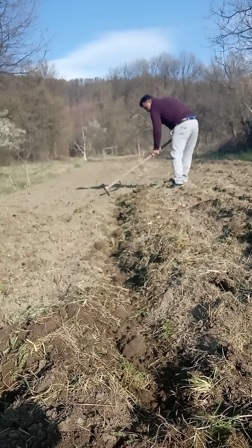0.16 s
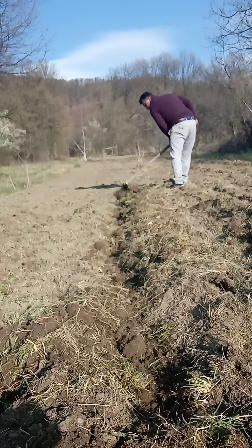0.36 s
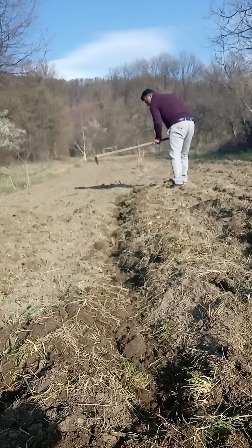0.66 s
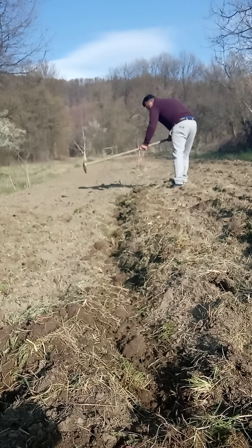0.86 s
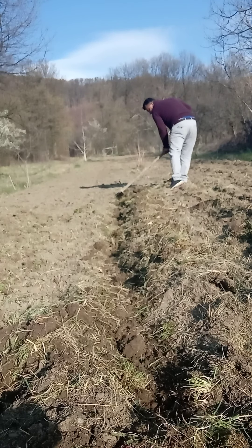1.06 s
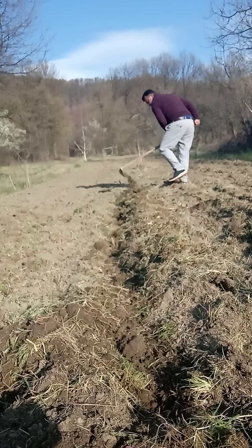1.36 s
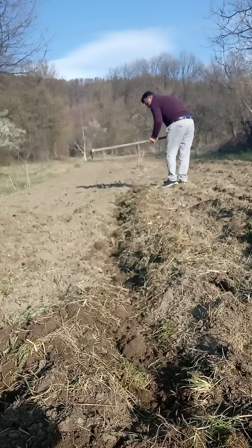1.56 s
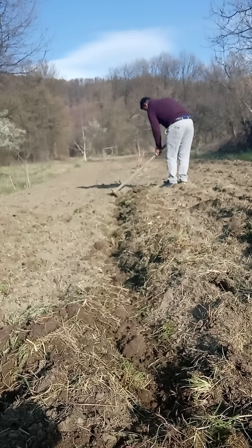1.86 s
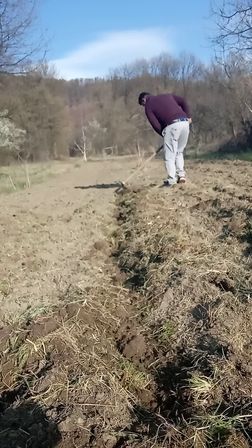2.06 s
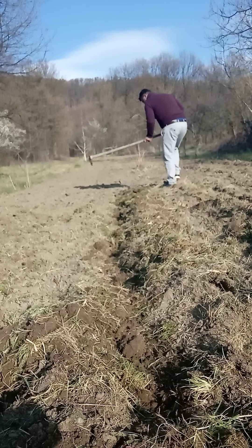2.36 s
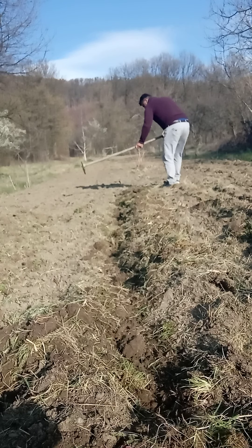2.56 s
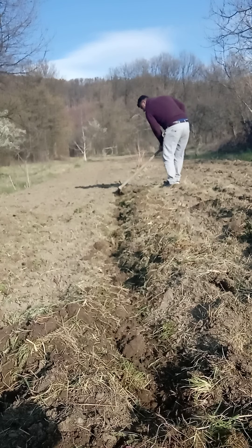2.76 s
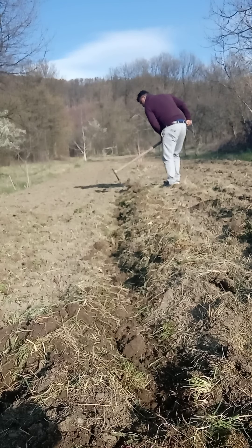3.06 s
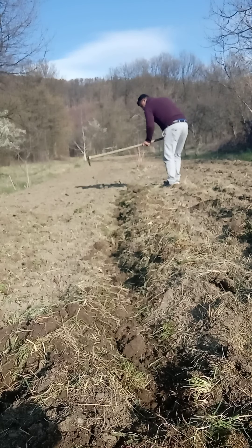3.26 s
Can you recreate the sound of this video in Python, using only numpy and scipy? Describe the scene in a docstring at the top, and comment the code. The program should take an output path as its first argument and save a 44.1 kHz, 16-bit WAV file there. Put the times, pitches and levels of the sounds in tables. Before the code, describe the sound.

Phone vibration motor buzzes twice, about a second each, while a hoe faintly scratches soil outdoors.

```python
"""A quiet field where a phone's vibration motor buzzes twice while a hoe scratches the soil metres away.
Each buzz spins up, holds and coasts: an off-centre weight shakes the case as a low sine and loose parts
rattle as coloured noise. The brushes tick, whine in multiples of the shaft speed and hiss in gated noise.
The hoe is short filtered noise with an echo; behind it lie a soft mid hush, far rumble and traffic wash."""
import sys
import numpy as np
from scipy import signal
from scipy.fft import rfft, irfft
from scipy.io import wavfile
from scipy.ndimage import uniform_filter1d

SR = 44100
rng = np.random.default_rng(int(sys.argv[2]) if len(sys.argv) > 2 else 0)


def level_to_linear(level):
    """Convert decibel levels to linear amplitude factors, elementwise."""
    exponent = np.asarray(level, float) / 20
    return 10 ** exponent


def put_to_file(sound):
    """Save the sound as 16-bit audio at rate SR, in the file named by the first command-line argument."""
    columns = np.atleast_2d(sound).T  # one column per channel
    safe = np.clip(columns, -1, 1)
    whole_steps = np.round(safe * 32767)
    wavfile.write(sys.argv[1], SR, whole_steps.astype(np.int16))


N = 149940
FULL_SPEED_HZ = 187.6  # shaft speed that the whine and the brushes are scaled to


def curve(table, at):
    """Straight lines through (x, y) rows."""
    return np.interp(at, *np.array(table, float).T)


def unit(x):
    """Scaled to rms 1."""
    return x / np.sqrt(np.mean(x ** 2))


def coloured(table, lo_hz=1., hi_hz=30000.):
    """Noise shaped by (Hz, dB) rows; a lo_hz above 1 tapers it to the band lo_hz to hi_hz."""
    hz = np.maximum(np.arange(N // 2 + 1) * SR / N, 1)
    row_hz, row_db = np.array(table, float).T
    taper = 1
    if lo_hz > 1:
        place = np.log(hz / lo_hz) / np.log(hi_hz / lo_hz)
        taper = np.sin(np.pi * np.clip(place, 0, 1))
    gain = level_to_linear(np.interp(np.log(hz), np.log(row_hz), row_db))
    return irfft(rfft(rng.standard_normal(N)) * taper * gain, N)


def walk(rate):
    """Random levels held 1 / rate s and slewed twice; rms 1."""
    k = int(SR / rate)
    steps = np.repeat(rng.standard_normal(N // k + 1), k)
    return unit(uniform_filter1d(uniform_filter1d(steps, k), k)[:N])


def band(x, hz, width_hz):
    """Resonant band-pass, applied twice."""
    b, a = signal.iirpeak(hz, hz / width_hz, SR)
    return signal.lfilter(b, a, signal.lfilter(b, a, x))


def field(t):
    """Bands of hush that swell together and flicker alone, a low rumble and a far traffic wash."""
    # Colour of the hush. Each row: frequency in Hz, relative level in dB per Hz.
    hush_colour = [(15, -68.5), (25, -42.5), (45, -12), (65, -5), (110, -9), (170, -17), (260, -28.5),
                   (400, -34.5), (520, -24.5), (800, -25.5), (1000, -13.5), (1300, -18), (1700, -21),
                   (2100, -35), (2800, -45.5), (4000, -48), (6000, -48.5), (8000, -59.5), (16000, -64.5)]
    # How the hush swells and sinks. Each row: time in seconds, level change in dB.
    hush_swell = [(0, -0.5), (1.2, 1), (1.4, 2), (1.47, -1), (1.7, -0.5), (1.85, -2), (2.0, 0), (2.6, -2)]
    # Far rumble. Each row: time in seconds, rms level in dB.
    rumble_level = [(0, -72), (2.25, -71.5), (2.9, -59.5), (3.4, -62)]
    # Far traffic wash. Each row: time in seconds, rms level in dB.
    wash_level = [(0, -77), (.9, -73), (1.25, -74.5), (1.4, -72), (1.5, -80), (2.1, -79.5), (2.9, -76),
                  (3.3, -74)]
    hush_db, flicker_db = -65, 2.5

    swell = curve(hush_swell, t)
    hush = np.zeros(N)
    for lo_hz in 14 * 2 ** np.arange(0, 10.2, 1 / 3):
        # bands two thirds of an octave wide, a third apart
        noise = coloured(hush_colour, lo_hz, lo_hz * 2 ** (2 / 3))
        hush += level_to_linear(swell + flicker_db * walk(6.99)) * noise
    rumble = unit(band(rng.standard_normal(N), 62.1, 8.8))
    wash = unit(band(rng.standard_normal(N), 668, 350))
    out = level_to_linear(hush_db) * unit(hush)
    out += level_to_linear(curve(rumble_level, t)) * rumble
    return out + level_to_linear(curve(wash_level, t)) * wash


def shaft(t):
    """Speed and turns of the shaft: it spins up under power, then slows in a straight line to rest."""
    # Start of each buzz, in seconds.
    starts_s = (.1336, 2.134)
    # Powered shaft speed, one list a buzz. Each row: time in seconds, speed in Hz.
    speed = [
        [(0.2, 145.1), (0.252, 168.0), (0.278, 176.4), (0.298, 179.8), (0.328, 182.6), (0.38, 184.7),
         (0.502, 187.2), (0.738, 186.9), (1.12, 188.1)],
        [(2.2, 145.6), (2.222, 151.1), (2.264, 169.9), (2.282, 175.9), (2.314, 180.3), (2.352, 183.3),
         (2.498, 187.0), (2.94, 187.7), (3.12, 187.6)],
    ]
    power_s, coast_s = .99, .19
    jitter_turns, spin_up_jitter_turns = .00022, .03  # the second is scaled by the lack of speed

    since = np.where(t < starts_s[1], t - starts_s[0], t - starts_s[1])
    coast = np.clip(since - power_s, 0, None)
    rests = [(s, 0) for s in starts_s]
    hold = [(starts_s[1] - .001, speed[0][-1][1])]
    powered = sorted(rests + speed[0] + speed[1] + hold)
    hz = curve(powered, t) * np.clip(1 - coast / coast_s, 0, 1)
    hz = uniform_filter1d(hz, size=400)
    turns = np.cumsum(hz) / SR
    lack = np.clip(.97 - hz / FULL_SPEED_HZ, 0, 1)
    shaky_turns = turns + (jitter_turns + spin_up_jitter_turns * lack) * walk(190)
    return since, coast, hz, turns, shaky_turns


def shake_gain(hz, coast):
    """Strength of the case's shake, which follows shaft speed and dies off further in the coast."""
    # Shake under power. Each row: shaft speed in Hz, rms level in dB.
    shake_level = [(60, -86), (120, -54.5), (143, -53.5), (163, -43), (174, -39), (188, -38)]
    coast_loss_db_per_s = -150
    return level_to_linear(curve(shake_level, hz) + coast_loss_db_per_s * coast)


def case_shake(shake, turns):
    """The off-centre weight pushes the case once a turn, a plain sine."""
    return np.sqrt(2) * shake * np.sin(2 * np.pi * turns)


def case_rattle(shake, since):
    """Loose rattle of the case: coloured noise that follows the shake."""
    # Colour of the rattle. Each row: frequency in Hz, relative level in dB per Hz.
    rattle_colour = [(60, -28.5), (120, 12), (230, 6), (320, -5.5), (420, -19), (700, -6.5), (1200, -3.5),
                     (1600, -2), (2000, -47), (2600, -31.5), (7500, -31.5), (10000, -51)]
    # Rattle beyond its steady share. Each row: seconds after the start, extra level in dB.
    rattle_rise = [(0, 13), (.07, 19), (.1, 12), (.13, 1), (.2, 1.5), (.99, 1), (1.03, 20.5)]
    share_db = -23.5  # against the shake
    return level_to_linear(share_db + curve(rattle_rise, since)) * shake * unit(coloured(rattle_colour))


def brush_hiss(since, hz, shaky_turns):
    """Sliding brushes hiss; the turning shaft gates the noise, which is grittier at low speed."""
    # Hiss over a buzz. Each row: seconds after the start, level in dB.
    hiss_level = [(0, -70), (.02, -66), (.05, -65), (.075, -60), (.11, -60.5), (.15, -65), (.25, -69),
                  (.4, -70.5), (.98, -71), (1.0, -68), (1.02, -70), (1.12, -72), (1.16, -78), (1.24, -93)]
    # Colour of the hiss. Each row: frequency in Hz, relative level in dB per Hz.
    hiss_colour = [(1100, -25), (1800, -11.5), (2160, -2.5), (2500, -12.5), (3000, -8.5), (3600, -8),
                   (4600, -6.5), (6000, -8.5), (7000, -6.5), (8100, -19), (10800, -22.5), (13300, -41),
                   (15200, -30), (16500, -49)]
    # Top end of the hiss. Each row: seconds after the start, level change in dB.
    hiss_top = [(.11, 0), (.25, -9), (.4, -15), (.98, -15), (1.02, 2), (1.12, -6), (1.22, -15)]
    segments, gate_depth = 2.5, .4  # gatings a turn
    grit_db, top_from_hz, flutter_db = 1, 6800, 2

    gate = 1 + gate_depth * np.sin(2 * np.pi * segments * shaky_turns)
    gate += gate_depth * np.sin(2 * np.pi * shaky_turns)
    slowness = np.clip(1 - hz / FULL_SPEED_HZ, 0, 1) ** .5
    gate = unit(gate) * level_to_linear(grit_db * slowness * walk(500))
    hiss = unit(coloured(hiss_colour))
    low = signal.sosfiltfilt(signal.butter(3, top_from_hz, fs=SR, output="sos"), hiss)
    hiss = low + level_to_linear(curve(hiss_top, since)) * (hiss - low)
    sounding = (since > 0) * (since < 1.5)
    return level_to_linear(curve(hiss_level, since) + flutter_db * walk(10)) * sounding * gate * hiss


def brush_ticks(t):
    """First brush contacts: a click and a fast-fading chatter ring wide resonances."""
    # Contacts. Each row: time in seconds, level in dB of the click before it rings.
    contacts = [(0.134, -43), (.141, -41.5), (0.15, -48), (0.1575, -46), (2.135, -41), (2.139, -52),
                (2.142, -54), (2.1515, -55), (2.1547, -57)]
    # What a contact rings. Each row: frequency in Hz, width of the narrower filter in Hz, gain in dB.
    tick_rings = [(4130, 1640, 16), (6640, 2200, 12), (10300, 3300, -4.5)]
    chatter_s, chatter_db = .0008, -17.5  # decay time, level against the click

    ticks = np.zeros(N)
    n = SR // 100
    for start_s, db in contacts:
        click = level_to_linear(chatter_db) * rng.standard_normal(n) * np.exp(-t[:n] / chatter_s)
        click[0] = 1
        at = int(start_s * SR)
        ticks[at:at + n] += level_to_linear(db) * click
    out = np.zeros(N)
    for ring_hz, width_hz, db in tick_rings:
        out += level_to_linear(db) * band(band(ticks, ring_hz, width_hz), ring_hz, 2 * width_hz)
    return out


def brush_whine(hz, coast, shaky_turns):
    """Multiples of the shaft speed, louder with speed and where they sweep through rings of the case."""
    # Whine at full speed. Each row: multiple of the shaft speed, relative level in dB (first row unused).
    multiples = [(1, 0), (2, -43), (3, -38), (4, -47), (5, -24.5), (6, -39), (7, -36), (8, -21), (9, -29),
                 (10, -56), (11, -35), (12, -40), (13, -33), (14, -43), (15, -38), (16, -59), (17, -31),
                 (18, -44), (19, -40), (20, -33), (21, -39), (22, -38), (23, -38), (24, -35), (25, -40),
                 (26, -31), (27, -37), (28, -38), (29, -40), (30, -35), (31, -45), (32, -32), (33, -50),
                 (34, -47), (35, -42), (36, -48), (37, -46), (38, -48), (39, -57), (40, -56), (41, -44),
                 (42, -57), (43, -53), (44, -55), (45, -64), (46, -60), (47, -65), (48, -55), (49, -57),
                 (50, -70), (51, -66), (52, -60), (53, -59), (54, -76), (55, -59), (56, -58), (57, -59),
                 (58, -60), (59, -71), (60, -59), (61, -69), (62, -72), (63, -75), (64, -58), (65, -71),
                 (66, -60), (67, -70), (68, -64), (69, -74), (70, -70), (71, -72), (72, -74), (73, -73),
                 (74, -76), (75, -73), (76, -68), (77, -70), (78, -66), (79, -72), (80, -67), (81, -67),
                 (82, -65), (83, -60), (84, -68)]
    # Rings of the case. Each row: frequency in Hz, offset in Hz where a ring is down to a quarter, gain in dB.
    case_rings = [(1510, 60, 3), (2165, 60, 25), (3195, 90, 8), (3790, 120, 6), (4890, 140, 4)]
    # Low multiples that flutter more than the others.
    low_orders = (2, 3, 4, 6, 7)
    whine_db, db_per_octave, off_s = -38, 19, .012  # off_s: decay time once power is off
    flutter_db, low_flutter_db = 1.5, 4
    ring_lift_db = 11  # most that a ring lifts a multiple

    ring_hz = np.arange(SR // 2)
    ring_gain = np.ones(len(ring_hz))
    for centre_hz, width_hz, db in case_rings:
        ring_gain += level_to_linear(db) / (1 + ((ring_hz - centre_hz) / width_hz) ** 2) ** 2

    def ring(f):
        return np.interp(f, ring_hz, ring_gain)

    octaves = np.log2(hz / FULL_SPEED_HZ + 1e-6)
    loud = level_to_linear(whine_db + db_per_octave * octaves) * np.exp(-coast / off_s)
    on = np.flatnonzero(loud > 1e-5)
    flutter = [level_to_linear(flutter_db * walk(12))[on] for _ in range(5)]
    low_flutter = [level_to_linear(low_flutter_db * walk(9.004))[on] for _ in range(2)]
    whine = np.zeros(len(on))
    spin = wheel = np.exp(2j * np.pi * shaky_turns[on])
    for (k, db), phase in zip(multiples[1:], rng.random(len(multiples))):
        waver = low_flutter[k // 4 % 2] if k in low_orders else flutter[k % 5]
        lift = np.minimum(ring(k * hz[on]) / ring(k * FULL_SPEED_HZ), level_to_linear(ring_lift_db))
        wheel = wheel * spin  # the next multiple
        whine += level_to_linear(db) * waver * lift * (wheel * np.exp(2j * np.pi * phase)).imag
    out = np.zeros(N)
    out[on] = np.sqrt(2) * loud[on] * whine
    return out


def motor(t):
    """All that the turning shaft drives: shake, rattle, hiss and whine, with the first brush ticks."""
    since, coast, hz, turns, shaky_turns = shaft(t)
    shake = shake_gain(hz, coast)
    out = case_shake(shake, turns) + case_rattle(shake, since)
    out += brush_hiss(since, hz, shaky_turns) + brush_ticks(t)
    return out + brush_whine(hz, coast, shaky_turns)


def hoe():
    """Short gritty scratches with a bright edge and a faint tail from the tree line."""
    # Hoe scratches and soil crumbs. Each row: start in seconds, relative level in dB,
    # time to the peak in seconds, centre in Hz, bright edge against the body in dB.
    scratches = [(0.2274, -48.5, 0.0026, 2410, -30), (1.017, -60.5, 0.0028, 6960, -15),
                 (1.021, -55.5, 0.0048, 3000, -30), (1.259, -57, 0.00085, 6000, -15),
                 (1.891, -67, 0.0018, 6000, -20), (1.8955, -53.5, 0.0026, 5960, -8),
                 (1.8946, -47.5, 0.0026, 1670, -30), (1.904, -53, 0.0037, 2230, -38),
                 (1.9119, -53, 0.0017, 6350, -6), (1.913, -48, 0.0022, 2320, -28),
                 (1.917, -45.5, 0.0019, 1580, -30), (2.035, -75, 0.0039, 2730, -32),
                 (2.715, -50, 0.003, 4100, -27), (2.7231, -42.5, 0.00098, 5000, -19),
                 (2.7243, -41, 0.002, 2670, -46)]
    body_top_hz, edge_hz = 10400, 15500
    echo_db, echo_t60_s, echo_hz = -11, .28, 5000

    out, n = np.zeros(N), SR // 10
    cut = signal.butter(3, body_top_hz, fs=SR, output="sos")
    d = np.arange(n) / SR
    for start_s, db, peak_s, hz, edge_db in scratches:
        grit = rng.standard_normal((2, n))
        body = unit(signal.sosfilt(cut, band(grit[0], hz, hz * hz / 5000)))
        edge = unit(band(grit[1], edge_hz, 1500))
        swell = d / peak_s * np.exp(1 - d / peak_s) / 2
        at = int(start_s * SR)
        out[at:at + n] += level_to_linear(db) * swell * (body + level_to_linear(edge_db) * edge)
    d = np.arange(SR // 3) / SR
    tail = band(rng.standard_normal(len(d)), echo_hz, 6000) * level_to_linear(-60 * d / echo_t60_s)
    tail /= np.sqrt(np.sum(tail ** 2))
    return out + level_to_linear(echo_db) * signal.fftconvolve(out, tail)[:N]


def scene():
    """Field, motor and hoe in one channel."""
    t = np.arange(N) / SR
    return (field(t) + motor(t) + hoe())[None]


def top_cut(x):
    """Nothing passes above the cut-off."""
    return signal.sosfilt(signal.butter(12, 16690, fs=SR, output="sos"), x)


def record(dry):
    """Steep low-pass at 15.8 kHz, the top limit of the finished sound."""
    low_pass = signal.ellip(8, .2, 50, 15800, fs=SR, output="sos")
    mix = signal.sosfilt(low_pass, dry)
    return top_cut(mix)


dry = scene()
out = record(dry)
put_to_file(out)
```